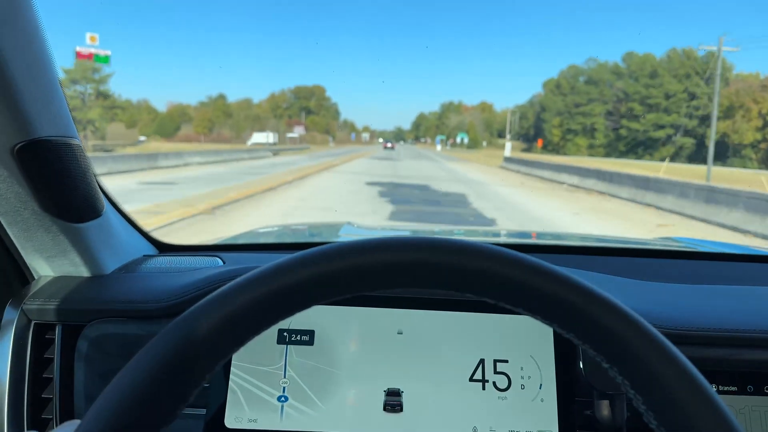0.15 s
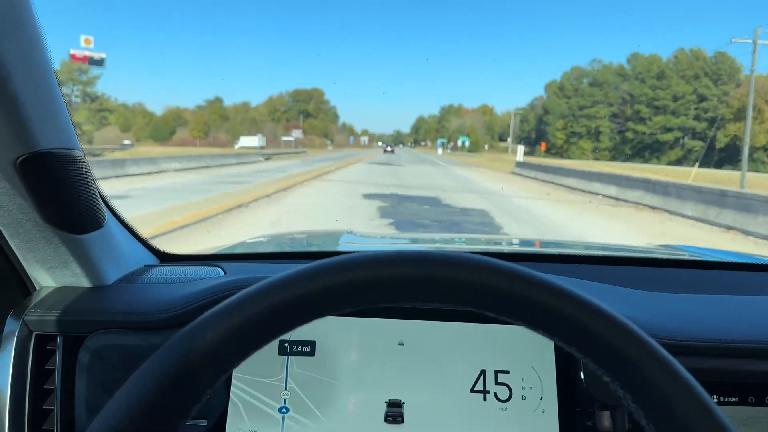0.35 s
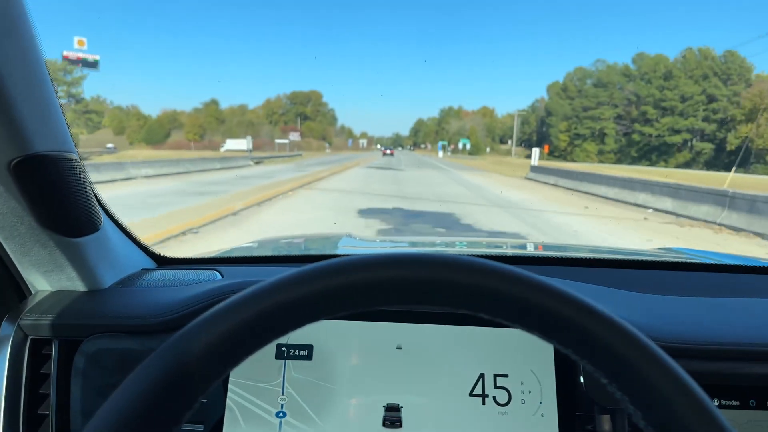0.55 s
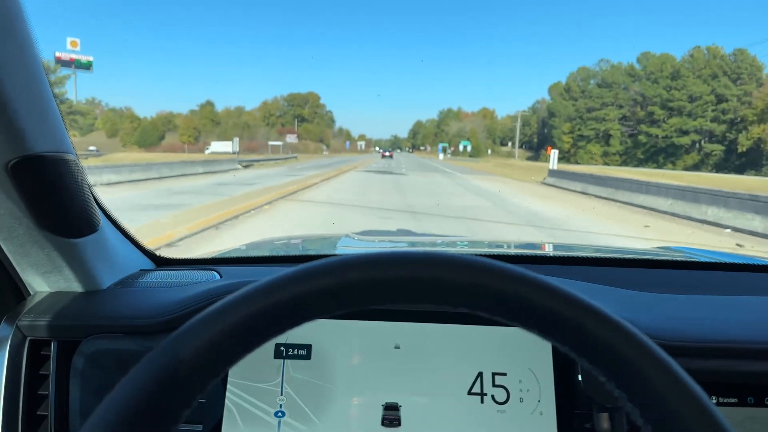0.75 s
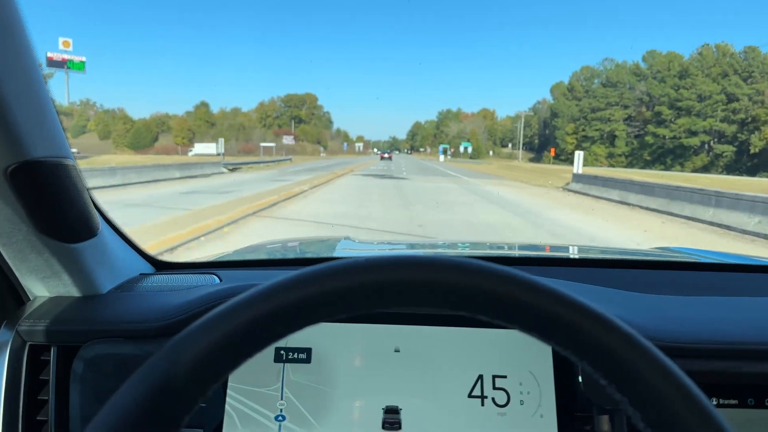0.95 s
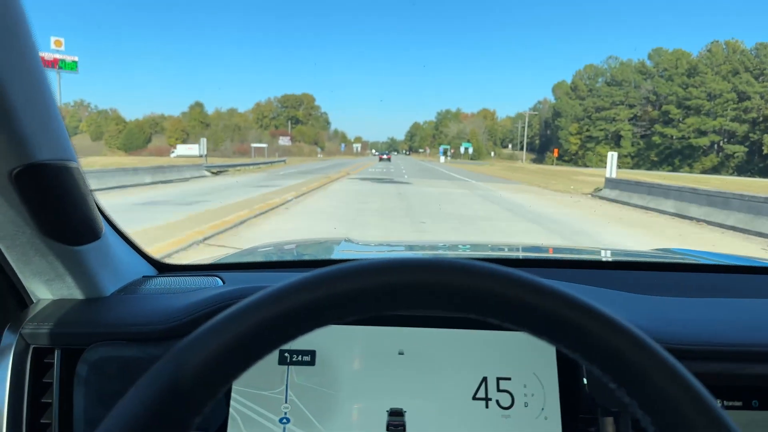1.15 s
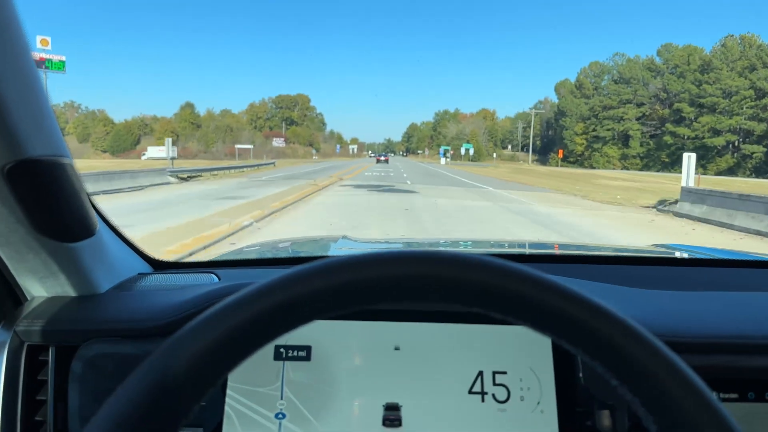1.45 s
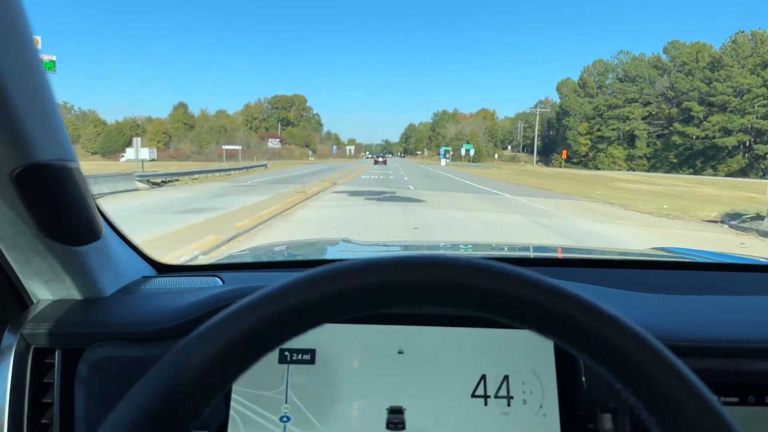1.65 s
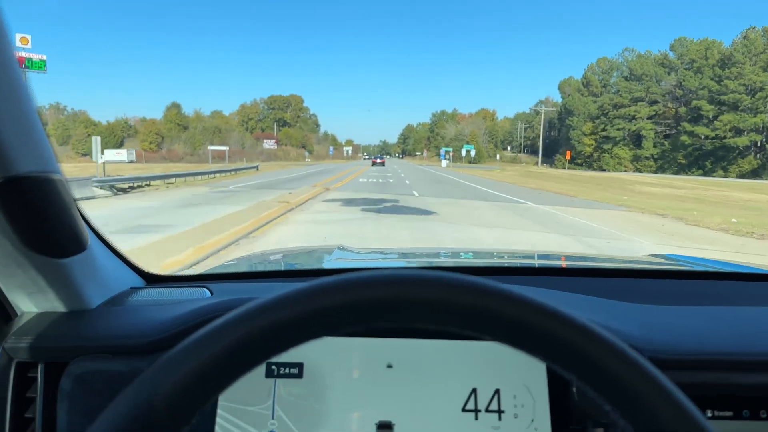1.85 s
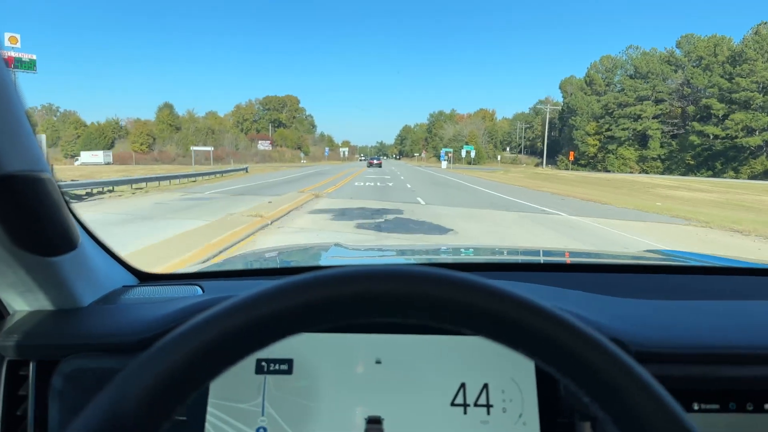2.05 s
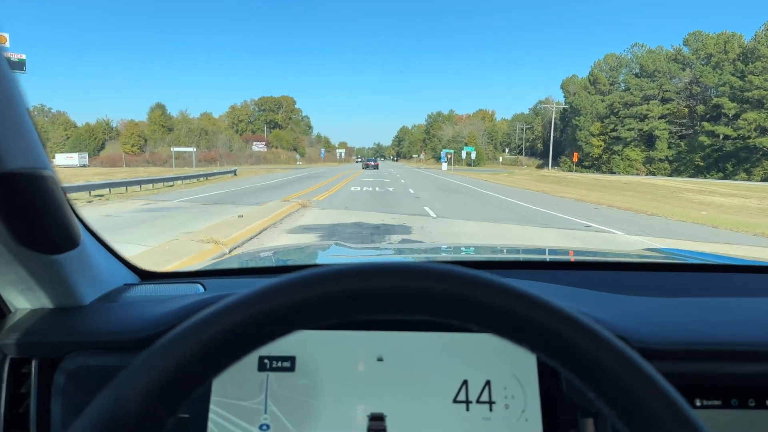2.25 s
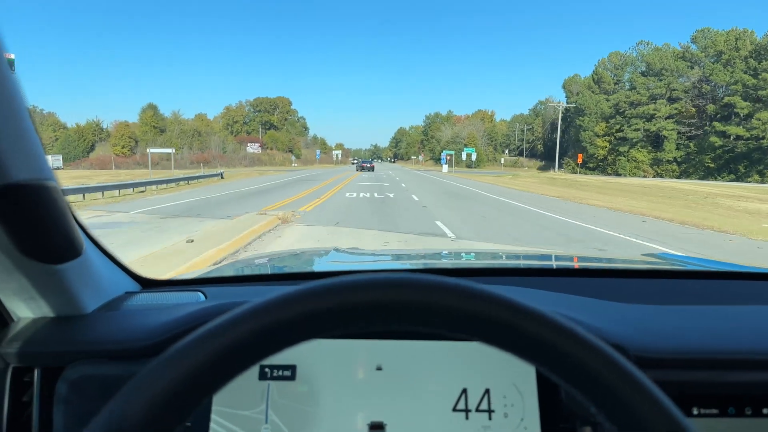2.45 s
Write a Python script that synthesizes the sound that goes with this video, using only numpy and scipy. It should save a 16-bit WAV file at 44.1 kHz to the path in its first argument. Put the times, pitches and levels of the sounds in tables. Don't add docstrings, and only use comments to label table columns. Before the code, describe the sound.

Low, bassy road rumble fills a closed car cabin at steady speed; soft thumps grow into a heavier thudding stretch near the middle, with faint trim rattles, then ease. Close stereo microphone at the driver's seat.

```python
import sys
import numpy as np
from scipy import signal
from scipy.fft import rfft, irfft
from scipy.io import wavfile
from scipy.ndimage import uniform_filter1d

SR = 44100
rng = np.random.default_rng(int(sys.argv[2]) if len(sys.argv) > 2 else 0)


def pcm_store(signal):
    levels = np.round(np.clip(np.atleast_2d(signal), -1, 1) * 32767)
    wavfile.write(sys.argv[1], SR, levels.astype(np.int16).T)


def volts_from_decibels(level):
    exponent = np.asarray(level, float) / 20
    return 10 ** exponent


N = 114660


def unit(x):
    return x / np.sqrt(np.mean(x ** 2))


def at(table, hz):
    table_hz, value = np.array(table).T
    return np.interp(np.log(np.maximum(hz, 1)), np.log(table_hz), value)


def ring(hz, width_hz, steep=2):
    f_hz = np.arange(N // 2 + 1) * SR / N + 1e-3
    resonance = 1 / (1 + 1j * (f_hz - hz * hz / f_hz) / width_hz) ** steep
    return unit(irfft(rfft(rng.standard_normal(N)) * resonance, N))


def walk(rate_hz):
    hold = int(SR / rate_hz)
    steps = np.repeat(rng.standard_normal(N // hold + 1), hold)[:N]
    return unit(uniform_filter1d(uniform_filter1d(steps, hold), hold))


# f/Hz, level/dB
LEAN = [(40, .4), (90, 2.1), (140, 2.5), (210, 2.1), (490, -.4), (740, 1.5), (2200, -1.4), (6000, 1.5)]


def pair(mid, side, hz):
    lean_db = at(LEAN, hz) * np.array([[.5], [-.5]])
    return np.array([mid + side, mid - side]) * volts_from_decibels(lean_db)


# t/s, level/dB
ROUGHNESS = [(0, -29.5), (.15, -34), (.35, -30), (.5, -31.5), (.65, -28), (.8, -29.5), (.9, -23.5),
             (1.02, -28.5), (1.12, -20.5), (1.25, -24), (1.4, -24.5), (1.55, -28.5), (1.72, -32),
             (1.9, -30.5), (2.2, -33.5), (2.59, -31.5)]


def road_roughness(t):
    level_db = np.interp(t, *np.array(ROUGHNESS).T)
    return uniform_filter1d(level_db, size=900) + 30


# f/Hz, width/Hz, level/dB, follow/(dB per dB roughness), side/dB
CABIN_MODES = [(38.2, 13, -6, 0.57, -16.5), (52, 13, -8, 1, -18.5), (70.6, 26.4, -2, 1, -11.5),
               (98, 17.6, -3.5, 0.88, -26), (122, 20.9, -6.5, 1.16, -16), (150.8, 31.7, -5.5, 0.64, -17.5),
               (200.5, 51, -13.5, 0.45, -4), (257, 33, -19.5, .5, -1.5)]
CABIN_DB, FLUTTER_DB, FLUTTER_HZ = -29, 0.45, 8.73


def boom(rough_db):
    out = 0
    for hz, width_hz, db, follow, side_db in CABIN_MODES:
        mid = ring(hz, 1.51 * width_hz)
        side = volts_from_decibels(side_db) * ring(hz, 1.3 * width_hz)
        level_db = CABIN_DB + db + follow * rough_db + FLUTTER_DB * walk(FLUTTER_HZ)
        out = out + volts_from_decibels(level_db) * pair(mid, side, hz)
    return out


# f/Hz, level/(dB per Hz)
ROAR_SPECTRUM = [(150, 2), (260, 0.5), (520, -6), (900, -14), (1600, -22.5), (2600, -31), (5000, -42.5),
                 (8000, -49.5), (12000, -60.5)]
# f/Hz, width/Hz, level/dB
PANELS = [(508.6, 39, -51.5), (433.6, 71, -51.5), (360, 39, -56.5), (572, 21, -61), (791, 106, -56.5),
          (1163, 82, -61), (1505, 160, -63.5)]
# f/Hz, level/dB
WIDTH = [(200, -4.5), (320, -3), (490, -7.5), (800, 0), (2600, -0.5), (5000, 0.5), (8500, 1.5),
         (10500, -13)]
ROAR_DB, ROAR_FOLLOWS, ROAR_FLICKER_DB = -41.5, 0.21, .5


def roar(rough_db):
    bands, power = 0, 0
    for hz in 160 * 2 ** (np.arange(21) / 3):
        gain = volts_from_decibels(at(ROAR_SPECTRUM, hz)) * np.sqrt(hz)
        power += gain * gain
        mid = ring(hz, hz / 2.4, steep=3.07)
        side = volts_from_decibels(at(WIDTH, hz)) * ring(hz, hz / 2.3, steep=3)
        bands = bands + gain * volts_from_decibels(ROAR_FLICKER_DB * walk(14)) * pair(mid, side, hz)
    out = bands * volts_from_decibels(ROAR_DB + ROAR_FOLLOWS * rough_db) / np.sqrt(power)
    for hz, width_hz, db in PANELS:
        side = volts_from_decibels(at(WIDTH, hz)) * ring(hz, width_hz)
        out = out + volts_from_decibels(db + 1.7 * walk(4.9)) * pair(ring(hz, width_hz), side, hz)
    return out


BUZZ_HZ, BUZZ_WIDTH_HZ = 9730, 1400
BUZZ_DB, BUZZ_FOLLOWS = -85, 1
BUZZ_PER_S, BUZZ_SCATTER_DB, BUZZ_TAIL_S = 400, 1.2, .006


def buzz(rough_db):
    hits = (rng.random(N) < BUZZ_PER_S / SR) * volts_from_decibels(BUZZ_SCATTER_DB * rng.exponential(size=N))
    grains = unit(signal.lfilter([1], [1, -np.exp(-1 / (BUZZ_TAIL_S * SR))], hits))
    env = grains * volts_from_decibels(BUZZ_DB + BUZZ_FOLLOWS * rough_db)
    side = .4 * ring(BUZZ_HZ, BUZZ_WIDTH_HZ)
    return env * pair(ring(BUZZ_HZ, BUZZ_WIDTH_HZ), side, BUZZ_HZ)


WHINE_HZ, WHINE_DB = 14520, -88


def whine(t):
    level = volts_from_decibels(WHINE_DB + .7 * walk(5)) * np.sqrt(2)
    return level * np.sin(2 * np.pi * WHINE_HZ * t) * np.array([[1.3], [.7]])


# t/s, level/dB, tail/s, broad crack share/(0-1)
RATTLES = [(0.022, -77, .012, 0.3), (.867, -70, .008, .4), (.887, -77.5, 0.0067, .5),
           (.942, -79, 0.0044, .6), (1.003, -72.5, 0.014, .3), (1.06, -79, .02, .05),
           (1.111, -64.5, 0.0043, .8), (1.132, -73, .015, .6), (1.163, -74, 0.023, 0.1),
           (1.22, -77.5, .008, .4), (1.247, -77.5, .012, 0.3), (1.274, -70.5, .008, .5),
           (1.302, -73.5, .008, .3), (1.327, -75.5, 0.011, .3), (1.362, -79, .008, 0.18),
           (1.392, -79, 0.0087, 0.1), (1.42, -78.5, .01, .2), (1.531, -71, .007, .2),
           (1.575, -77, 0.0092, .2), (1.672, -74.5, .006, .1), (1.703, -69.5, 0.014, 0.2),
           (1.775, -78, 0.035, .05), (1.866, -74.5, .004, .9), (.699, -77.5, .004, 1),
           (.707, -77.5, .02, 0.9)]
RATTLE_HZ, RATTLE_WIDTH_HZ = 9900, 2400
CRACK_HZ, CRACK_WIDTH_HZ = 8500, 12000


def rattles(t):
    start_s, db, tail_s, crack = np.array(RATTLES).T[:, :, None]
    u = t - start_s
    env = volts_from_decibels(db) * np.clip(u / .0004, 0, 1) * np.exp(-np.maximum(u, 0) / tail_s)
    ring_env = env.sum(axis=0)
    crack_env = (np.clip(crack, 0, 2) * env).sum(axis=0)
    ring_side = .3 * ring(RATTLE_HZ, RATTLE_WIDTH_HZ)
    bright = pair(ring(RATTLE_HZ, RATTLE_WIDTH_HZ), ring_side, RATTLE_HZ)
    crack_side = .4 * ring(CRACK_HZ, CRACK_WIDTH_HZ / 2)
    broad = pair(ring(CRACK_HZ, CRACK_WIDTH_HZ, steep=1), crack_side, CRACK_HZ)
    return ring_env * bright + crack_env * broad


# t/s, f/Hz, level/dB, swell/s
THUMPS = [(.1, 41.5, -29.5, 0.028), (.58, 55, -27, .02), (1.72, 44.7, -27, 0.03), (2.06, 48, -27.5, .03),
          (2.21, 45, -29, 0.02), (2.46, 45, -29.5, 0.022), (.25, 46, -30, .035),
          (0.518, 50.6, -21.5, 0.024), (0.738, 50.6, -22.5, 0.037), (0.869, 52, -23, 0.016),
          (0.961, 46.5, -18, 0.032), (1.107, 53.7, -20, 0.061), (1.261, 47.75, -11, 0.047),
          (1.429, 50.2, -15, 0.033), (1.61, 53.9, -18.5, 0.035), (1.85, 42.1, -28.5, 0.037),
          (2.362, 52, -22, 0.041), (0.121, 98, -28, 0.03), (0.298, 117.7, -19, 0.038),
          (0.459, 140.7, -24.5, 0.036), (0.681, 101, -21, 0.033), (0.859, 123, -21.5, 0.046),
          (0.941, 107, -21.5, 0.036), (1.046, 102, -15, 0.026), (1.14, 95.7, -18, 0.037),
          (1.246, 121.8, -20.5, 0.03), (1.451, 115.8, -26.5, 0.036), (1.68, 139.5, -23, 0.04),
          (.06, 155.3, -27, 0.024), (.2, 98, -28.5, 0.028), (.21, 200, -32, .025), (.26, 135, -24.5, 0.021),
          (.78, 144.4, -28, .03), (.87, 139, -26.5, 0.017), (1.1, 149.8, -28, .03),
          (1.119, 207.6, -35, .03), (1.27, 236.3, -36.5, .03), (1.28, 384, -39.5, 0.022),
          (1.63, 181, -33, 0.022), (2.09, 161, -30.5, 0.023), (2.1, 249, -36.5, 0.024),
          (2.199, 86, -31, 0.039), (2.341, 211, -35.5, .025), (2.43, 110, -32, 0.044)]
THUMP_SHARP = 1.8


def thumps(t):
    out = 0
    for start_s, hz, db, swell_s in THUMPS:
        u = np.maximum(t - start_s, 0) / swell_s
        env = volts_from_decibels(db) * (u * np.exp(1 - u)) ** THUMP_SHARP
        out = out + pair(env * np.sin(2 * np.pi * hz * (t - start_s)), 0, hz)
    return out


# t/s, level/dB, f/Hz, t60/s
TICKS = [
    (0.572, -55.5, 7600, .008),
    (0.841, -63, 10200, .02),
    (0.699, -67, 14900, .006),
    (.942, -66.5, 14800, .006),
    (.98, -63, 13500, .006),
    (.87, -71.5, 13800, .015),
    (1.026, -73, 14300, 0.0059),
]


def ticks(t):
    out = 0
    for start_s, db, hz, t60_s in TICKS:
        u = np.maximum(t - start_s, 0)
        env = volts_from_decibels(db) * np.minimum(u / .0006, 1) * np.exp(-np.log(1000) * u / t60_s)
        out = out + pair(env * np.sin(2 * np.pi * hz * u), 0, hz)
    return out


# t/s, length/s, level/dB, f/Hz
CREAKS = [(0.701, 0.036, -65, 2670), (0.65, 0.04, -70, 4600), (0.65, 0.044, -79.5, 7200),
          (0.909, .03, -77.5, 3200), (1.112, 0.057, -67, 2960), (1.126, .02, -61.5, 4450),
          (1.113, 0.048, -76, 7500), (1.112, 0.039, -81, 13130), (1.17, 0.031, -68, 5900),
          (1.323, 0.019, -73.5, 6350), (2.2, .03, -76.5, 6500), (0.86, .02, -77, 5600),
          (2.235, .03, -76.5, 4200)]
CREAK_ATTACK_S, CREAK_Q = 0.00084, 2


def creaks(t):
    out = 0
    for start_s, length_s, db, hz in CREAKS:
        u = t - start_s
        fade = np.exp(-np.maximum(u - length_s, 0) / (0.36 * length_s))
        env = volts_from_decibels(db) * np.clip(u / CREAK_ATTACK_S, 0, 1) * fade
        out = out + env * pair(ring(hz, hz / CREAK_Q), .6 * ring(hz, hz / CREAK_Q), hz)
    return out


def scene():
    t = np.arange(N) / SR
    rough_db = road_roughness(t)
    steady = boom(rough_db) + roar(rough_db) + buzz(rough_db) + whine(t)
    return steady + rattles(t) + thumps(t) + ticks(t) + creaks(t)


def top_cut(x):
    return signal.sosfilt(signal.butter(12, 15730, fs=SR, output="sos"), x)


CEILING, LOWCUT_HZ, FADE_S = .55, 24, 0.002


def record(dry):
    fade_in = np.minimum(np.arange(N) / SR / FADE_S, 1)
    rounded = CEILING * np.tanh(dry / CEILING) * fade_in
    lowcut = signal.butter(2, LOWCUT_HZ, "high", fs=SR, output="sos")
    return top_cut(signal.sosfilt(lowcut, rounded))


dry = scene()
out = record(dry)
pcm_store(out)
```